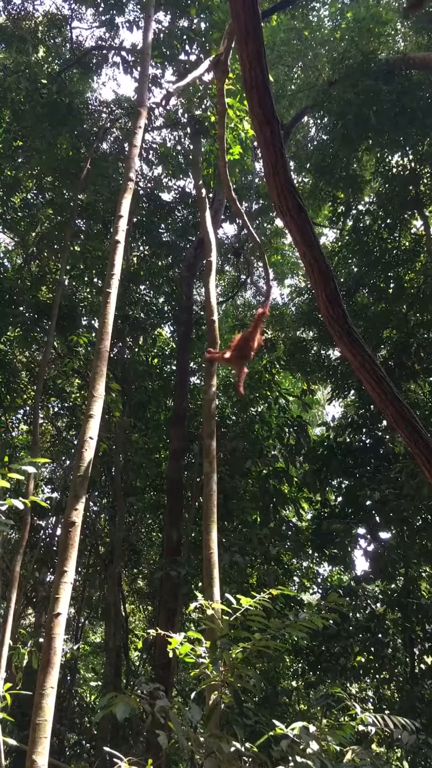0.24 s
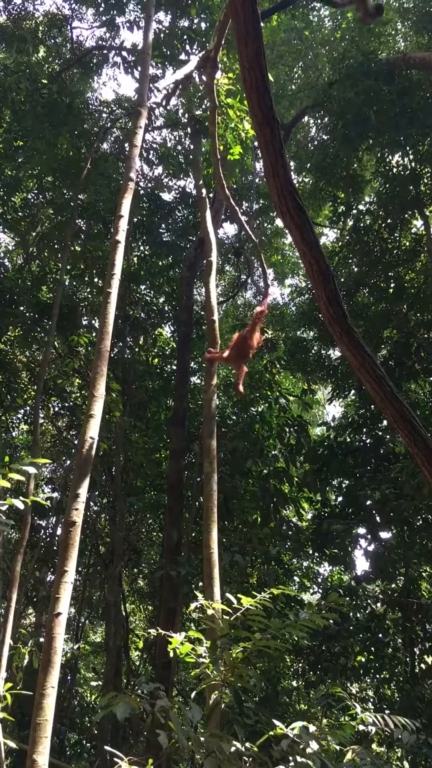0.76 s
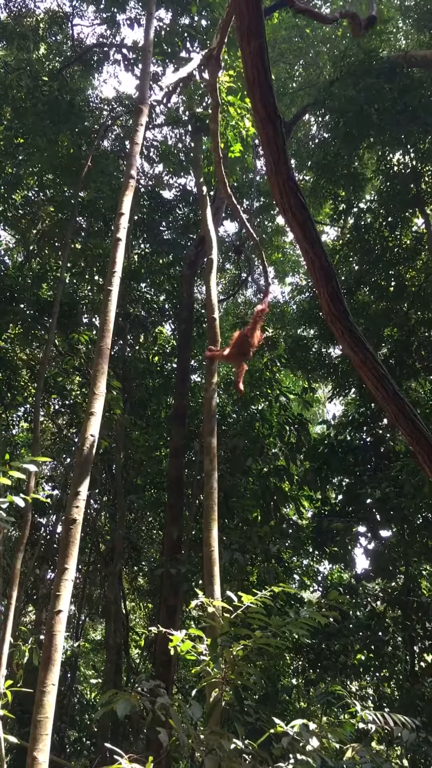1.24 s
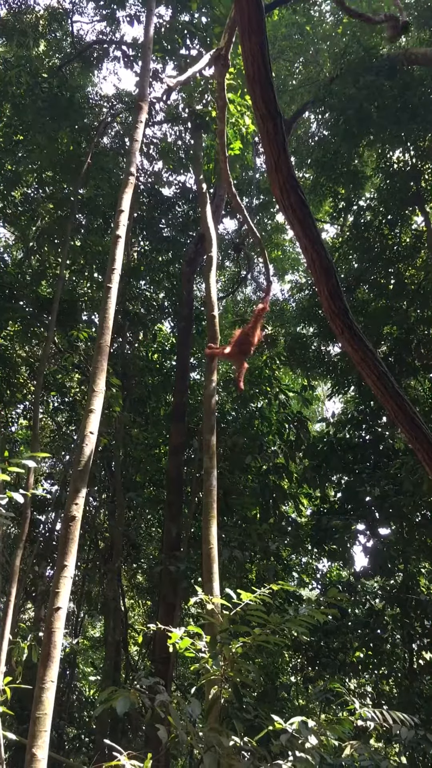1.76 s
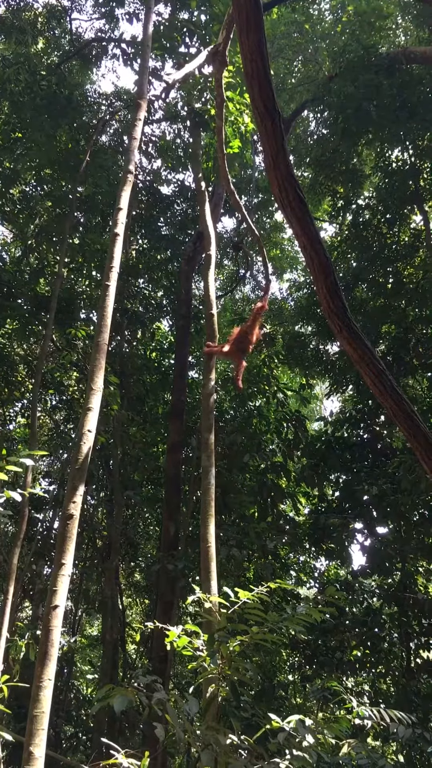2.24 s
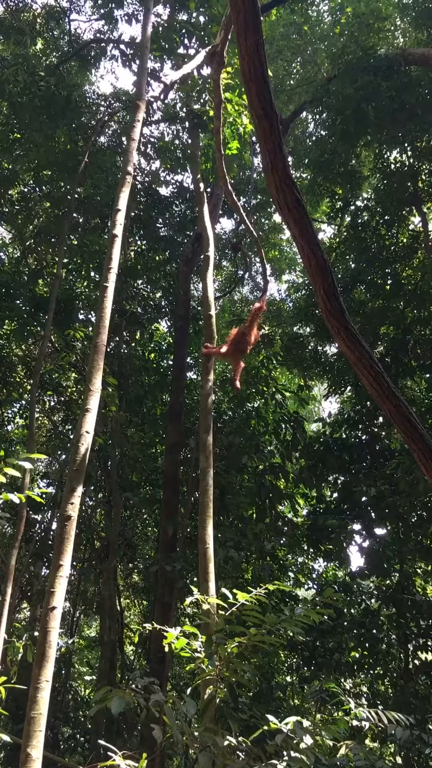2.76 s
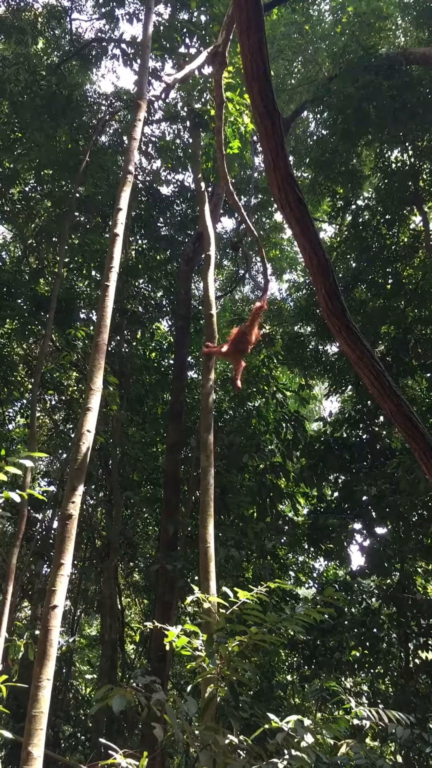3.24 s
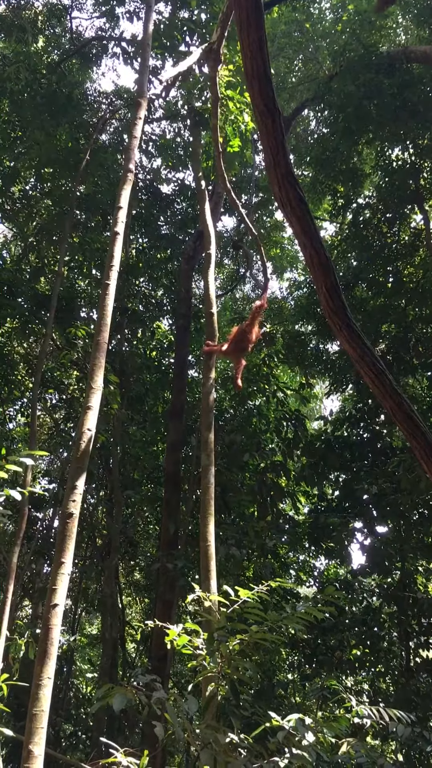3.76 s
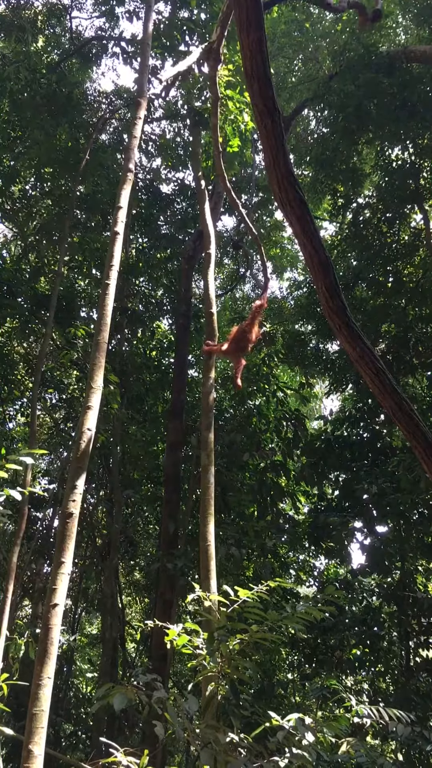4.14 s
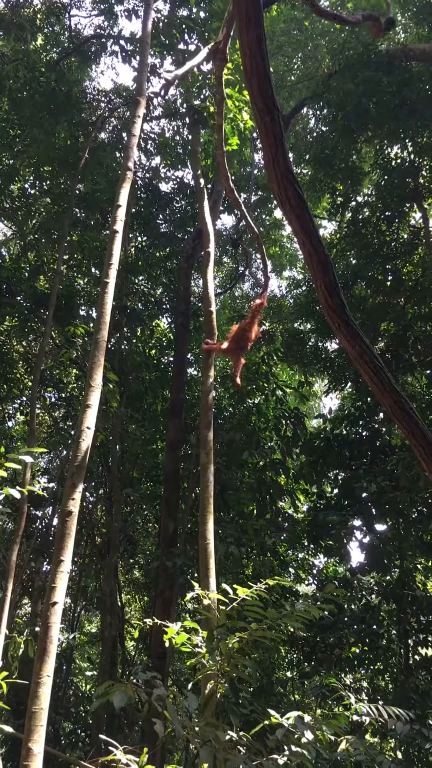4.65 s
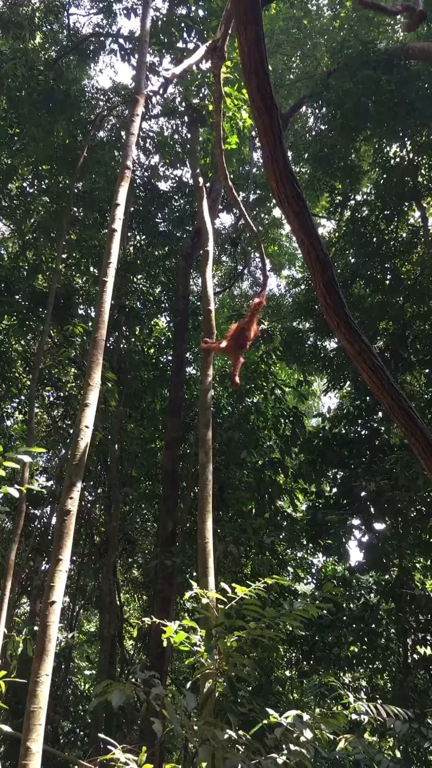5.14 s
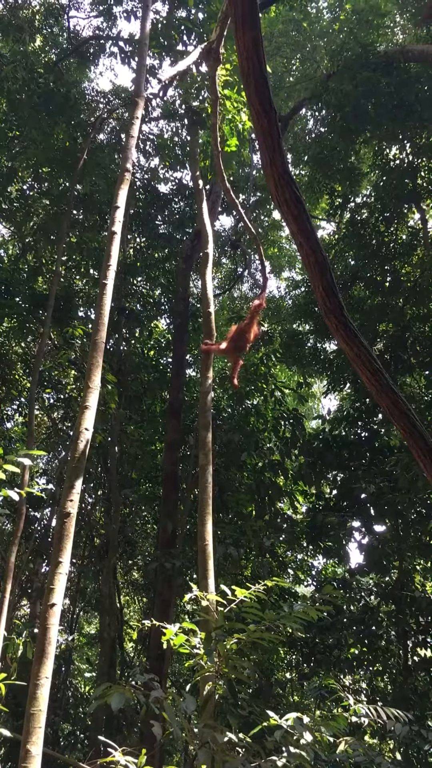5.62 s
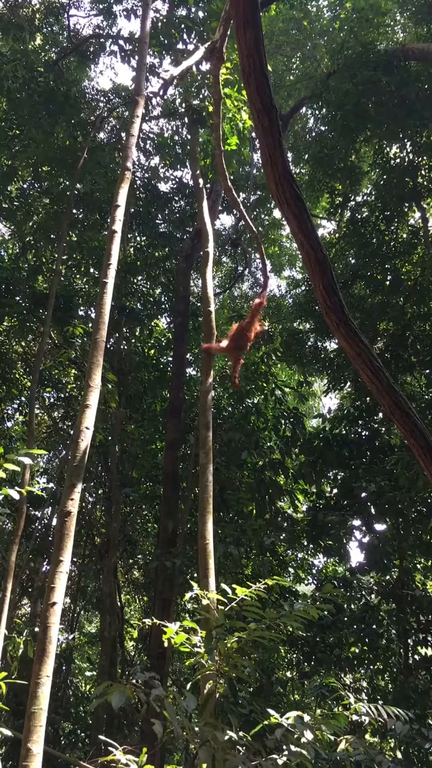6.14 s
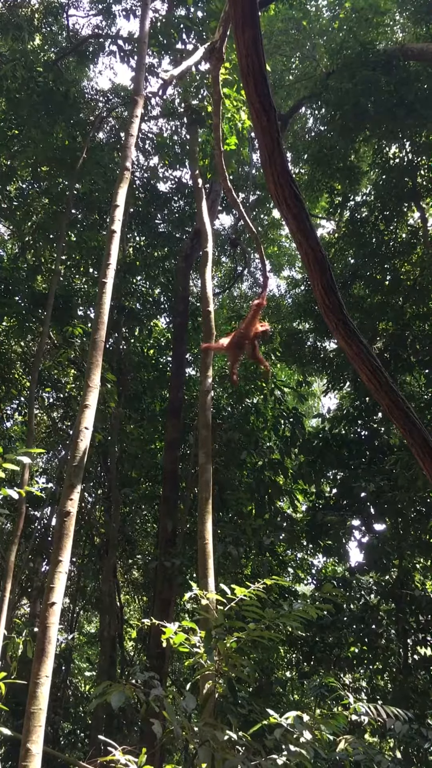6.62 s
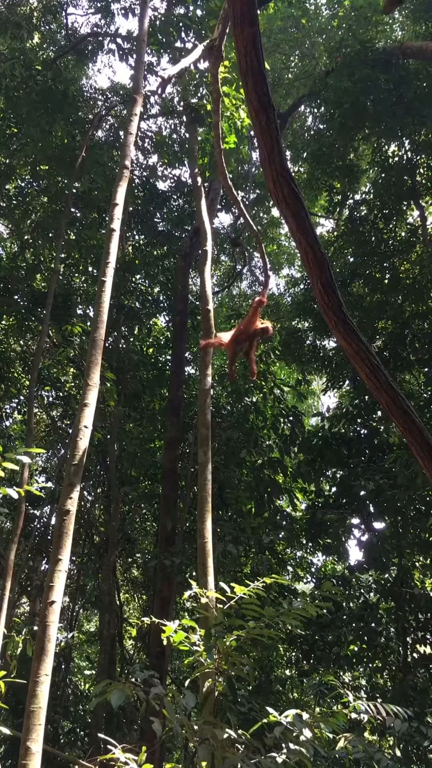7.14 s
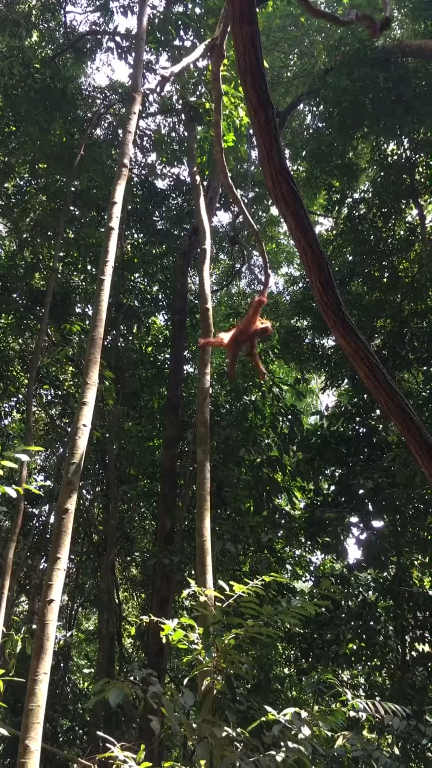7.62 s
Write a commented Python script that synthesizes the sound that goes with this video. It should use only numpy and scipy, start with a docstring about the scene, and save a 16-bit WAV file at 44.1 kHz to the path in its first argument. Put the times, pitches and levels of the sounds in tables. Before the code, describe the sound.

Cicadas sing in long, piercing, very high throbbing phrases over a steady insect buzz and leafy hiss, with a few soft low thumps.

```python
"""Midday cicadas in a rainforest

One cicada close by sings long, mostly rising phrases near 12 kHz, built from throbbing partials of a body tone.
Neighbours sing more faintly. Behind them far insects buzz as a blurred click train and hiss as resonant noise.
Shaped noise makes the leaf bed, two rustles, a high hiss and a low rumble of moving air.
Soft thumps, first a close pair and later a single one, are short decaying sine modes."""
import sys
import numpy as np
from scipy import signal
from scipy.fft import rfft, irfft, next_fast_len
from scipy.io import wavfile

SR = 44100
rng = np.random.default_rng(int(sys.argv[2]) if len(sys.argv) > 2 else 0)


def wrap_up_sound(samples):
    """Save the sound to the file named by the first command line argument, as 16-bit audio."""
    columns = np.atleast_2d(samples).T
    # keep every value between -1 and 1, then stretch to whole-number steps
    tamed = np.clip(columns, -1, 1)
    steps = np.round(tamed * 32767).astype(np.int16)
    wavfile.write(sys.argv[1], SR, steps)


N = 347508

# Pitch glide of the near cicada, one list a phrase. Each row: time in seconds, ring pitch in Hz.
NEAR_PITCH = [
    [(.12, 12277), (.21, 12201), (.25, 12180), (.484, 12202), (1.113, 12280), (1.6, 12330), (2.3, 12404),
     (2.5, 12420)],
    [(3.24, 12292), (3.315, 12267), (3.43, 12266), (3.829, 12305), (4.387, 12348), (5.335, 12424),
     (5.62, 12428)],
    [(6.32, 12313), (6.395, 12278), (6.445, 12272), (6.559, 12287), (6.924, 12318), (7.432, 12353),
     (7.876, 12385)],
]
# Loudness contour of its ring, one list a phrase. Each row: time in seconds, guide level in dB.
NEAR_RING_LEVEL = [
    [(0.12, -64), (0.2, -53), (0.32, -60), (0.49, -41.5), (0.52, -53), (0.58, -42.5), (0.62, -50),
     (0.75, -44.5), (0.99, -53), (1.11, -45.5), (1.25, -60), (1.29, -49), (1.37, -58), (1.45, -46.5),
     (1.54, -59), (1.64, -48), (1.76, -58), (1.84, -48), (1.99, -57), (2.17, -42), (2.25, -57), (2.29, -51),
     (2.41, -59), (2.5, -88)],
    [(3.24, -71), (3.33, -52), (3.44, -44), (3.51, -47.5), (3.6, -45), (3.65, -59), (3.73, -59),
     (3.84, -48.5), (4.3, -54), (4.39, -47), (4.5, -56), (4.54, -46), (4.78, -58), (4.88, -45), (4.97, -53),
     (5.01, -47), (5.06, -57), (5.12, -43.5), (5.19, -49), (5.25, -61), (5.34, -53), (5.38, -65),
     (5.41, -57), (5.62, -80)],
    [(6.32, -70), (6.366, -64), (6.392, -54), (6.436, -48.5), (6.57, -51), (6.648, -45.5), (6.704, -53),
     (6.748, -47), (6.8, -62), (6.926, -48), (6.96, -55), (7.082, -49), (7.126, -56), (7.19, -47),
     (7.242, -54), (7.298, -46.5), (7.354, -52), (7.402, -42), (7.438, -41), (7.48, -46), (7.628, -47.5),
     (7.692, -58), (7.71, -54.5), (7.876, -53)],
]
# Echoes off trunks favour some pitches and cancel others, alike in every phrase.
# Each row: ring pitch in Hz, guide level of the body tone in dB.
NEAR_BODY_ECHOES = [(12180, -67), (12199, -64), (12207, -73), (12219, -64.5), (12233, -73), (12243, -71),
                    (12251, -61), (12272, -63.5), (12288, -66.5), (12295, -82), (12303, -66),
                    (12312, -63.5), (12339, -65), (12346, -76), (12354, -64), (12376, -66.5), (12390, -79),
                    (12400, -74.5), (12414, -65.5), (12428, -75)]
# The same for the stroke line below the ring. Each row: ring pitch in Hz, guide level in dB.
NEAR_STROKE_ECHOES = [(12180, -60), (12200, -62.5), (12240, -64), (12262, -76), (12275, -53.5),
                      (12290, -72), (12312, -53), (12328, -63), (12345, -59), (12358, -62), (12368, -72),
                      (12380, -54), (12392, -63), (12400, -57.5), (12428, -65)]
# Lift of the body tone: one value in dB for each phrase.
PHRASE_BODY_DB = [1, 0, -0.5]
# Lines that follow the ring level. Each row: partial of the body tone, offset in half stroke rates,
# level in dB against the guide, scattered share of the power 0-1, blur (width of each of two poles) in Hz.
RING_LINES = [(4, 0, 3, .05, 30), (4, 2, -19, .5, 27), (4, -1, -18, .5, 40), (4, 1, -20, .6, 40),
              (4, -1, -9, .8, 280)]
# Lines that follow the body tone. Each row: partial, offset in half stroke rates, relative level in dB,
# scattered share 0-1, blur in Hz.
BODY_LINES = [(1, 0, 2, 0.05, 48), (1, 2, -18.5, 0.5, 14), (2, 0, -6.5, 0.25, 17), (3, 0, -3.5, 0.53, 18),
              (5, 0, -5, 0.37, 30), (5, -2, -1, 0.36, 34)]
# The stroke line just below the ring. Each row: partial, offset in half stroke rates, relative level in dB,
# scattered share 0-1, blur in Hz.
STROKE_LINES = [(4, -2, 0, 0.37, 29)]
NEAR_THROB_HZ = 302  # muscle strokes a second
ATTACK_S, RELEASE_S = 0.085, 0.24  # body tone and stroke line set in and die away
STROKE_FADE, STROKE_FADE_HZ = 0.46, 3.9  # random fading: scattered share 0-1, width of each pole


def near_cicada():
    """Three mostly rising phrases; weaker lines swell and fade as pitch crosses the echoes' peaks and nulls."""
    out = 0
    for pitch, ring_rows, body_db in zip(NEAR_PITCH, NEAR_RING_LEVEL, PHRASE_BODY_DB):
        t, ring_hz = span(pitch)
        edges = edges_db(t, ATTACK_S, RELEASE_S)
        ring = in_time(ring_rows, t)[0]
        body = through_nulls(NEAR_BODY_ECHOES, ring_hz) + body_db + edges
        stroke = through_nulls(NEAR_STROKE_ECHOES, ring_hz) + edges
        stroke = stroke + fading(STROKE_FADE, STROKE_FADE_HZ, count=len(t))
        lines = [RING_LINES, BODY_LINES, STROKE_LINES]
        out = out + phrase(t, ring_hz, [ring, body, stroke], NEAR_THROB_HZ, lines)
    return out


# Pitch glides of the neighbours, one list a phrase. Each row: time in seconds, ring pitch in Hz.
NEIGHBOUR_PITCH = [
    [(0, 11856), (.279, 11842), (.449, 11838)],
    [(.53, 11704), (.685, 11770), (.784, 11795), (1.004, 11835), (1.498, 11907)],
    [(3.9, 11701), (4.05, 11778), (4.149, 11806), (4.4, 11847), (4.698, 11891), (4.948, 11907)],
    [(6.2, 11385), (6.484, 11441), (6.639, 11460), (6.859, 11474), (7.048, 11492)],
]
# Neighbours' phrases. Each row: rise in seconds, fall in seconds, guide level of the ring in dB,
# clock time of the loudest body tone in seconds, guide level of the body tone there in dB.
NEIGHBOUR_PHRASES = [(.001, 0.11, -52, .2, -63.5), (.1, 0.61, -50.5, 1.104, -74),
                     (.25, .2, -51.5, 4.5, -68), (.28, 0.46, -54.5, 6.7, -62.5)]
# Lines that follow the neighbours' ring. Each row: partial of the body tone, offset in half stroke rates,
# relative level in dB, scattered share 0-1, blur (width of each of two poles) in Hz.
NEIGHBOUR_RING_LINES = [(4, 0, 1.5, 0.32, 28), (4, -2, -11, .6, 27), (4, 2, -11, 0.78, 52),
                        (5, 0, -20, .5, 33)]
# Lines that follow the neighbours' body tone. Each row: partial, offset in half stroke rates,
# relative level in dB, scattered share 0-1, blur in Hz.
NEIGHBOUR_BODY_LINES = [(1, 0, 0, .1, 17)]
NEIGHBOUR_THROB_HZ = 232  # muscle strokes a second
NEIGHBOUR_FADE, NEIGHBOUR_FADE_HZ = 0.43, 11  # random fading: scattered share 0-1, width of each pole
BODY_SWELL_DB_PER_S2 = 500


def neighbours():
    """Shorter phrases at lower pitch with slower strokes; the ring flutters, the body tone swells once."""
    out = 0
    for pitch, (rise, fall, ring_db, loudest, body_db) in zip(NEIGHBOUR_PITCH, NEIGHBOUR_PHRASES):
        t, ring_hz = span(pitch)
        flutter = fading(NEIGHBOUR_FADE, NEIGHBOUR_FADE_HZ, count=len(t))
        ring = ring_db + edges_db(t, rise, fall) + flutter
        body = body_db - BODY_SWELL_DB_PER_S2 * (t - loudest) ** 2
        lines = [NEIGHBOUR_RING_LINES, NEIGHBOUR_BODY_LINES]
        out = out + phrase(t, ring_hz, [ring, body], NEIGHBOUR_THROB_HZ, lines)
    return out


def phrase(t, ring_hz, levels_db, throb_hz, lines_by_level):
    """A cicada phrase: partials of the body tone with stroke side lines; echoes off trunks blur each line."""
    out = np.zeros(N)
    start = round(t[0] * SR)
    body_turn = 2 * np.pi * np.cumsum(ring_hz / 4) / SR  # the ring is four times the body tone
    half_strokes = np.pi * throb_hz * t
    for level_db, lines in zip(levels_db, lines_by_level):
        for partial, offset, line_db, scatter, blur_hz in lines:
            blur = np.sqrt(1 - scatter) + np.sqrt(scatter) * wander(blur_hz, count=len(t))
            turn = partial * body_turn + offset * half_strokes + rng.uniform(0, 2 * np.pi)
            line = np.real(blur * np.exp(1j * turn))
            out[start:start + len(t)] += np.sqrt(2) * from_db(level_db + line_db) * line
    return out


def span(pitch):
    """Sample times and ring pitch of a phrase."""
    first, last = round(pitch[0][0] * SR), min(N, round(pitch[-1][0] * SR))
    t = np.arange(first, last) / SR
    return t, in_time(pitch, t)[0]


EDGE_DB = -14  # level at the very start and end of a phrase, against its hold


def edges_db(t, rise, fall):
    """Attack, hold and release in dB; a phrase that reaches the end of the scene holds on."""
    fall = fall if t[-1] < N / SR - .01 else 1e-3
    away_from_hold = np.maximum(1 - (t - t[0]) / rise, 1 - (t[-1] - t) / fall)
    return EDGE_DB * np.clip(away_from_hold, 0, 1)


def fading(share, rate_hz, count):
    """A steady path and moving scattered paths add and cancel: level in dB with brief deep dips."""
    paths = np.sqrt(1 - share) + np.sqrt(share) * wander(rate_hz, count)
    return 20 * np.log10(np.abs(paths) + 1e-3)


def through_nulls(rows, at):
    """A dB table joined in amplitude: round swells, sharp nulls."""
    where, level_db = np.transpose(rows)
    return 20 * np.log10(np.interp(at, where, from_db(level_db)))


# Thumps. Each row: start in seconds, pitch in Hz, level of the lowest mode in dB as its decay begins,
# swell in seconds, 60 dB decay time in seconds, upper modes in dB against the lowest.
THUMPS = [(4.152, 158.5, -38, 0.0081, 0.2, -5), (4.193, 195, -45.5, 0.0041, 0.17, -11),
          (7.514, 184.6, -32.5, 0.0065, 0.076, -17.5)]
# Modes above the lowest. Each row: multiple of the pitch, level in dB against the upper-mode setting.
THUMP_MODES = [(1.75, -0.5), (2.6, -13), (3.5, -19.5)]


def thumps():
    """A soft knock swells for a moment and rings its low modes, with its own share of upper modes."""
    out = np.zeros(N)
    for start, hz, peak_db, swell, t60, upper_db in THUMPS:
        t = np.maximum(np.arange(N) / SR - start, 0)
        onset = np.sin(np.pi / 2 * np.minimum(t / swell, 1)) ** 2
        decay = from_db(peak_db - 60 * t / t60)
        lowest = np.sin(2 * np.pi * hz * t)
        upper = sum(from_db(upper_db + d) * np.sin(2 * np.pi * k * hz * t) for k, d in THUMP_MODES)
        out += onset * decay * (lowest + upper)
    return out


# Rustles. Each row: start in seconds, rise in seconds, fall in seconds, dull part in dB, bright part in dB.
RUSTLES = [(2.635, 0.15, 0.1, -63, -52.5), (4.19, 0.073, 0.16, -72, -57)]
# Spectrum of the dull part. Each row: frequency in Hz, relative density in dB.
DULL_COLOUR = [(2000, -31), (3000, -2), (3600, 3), (4300, -1), (5000, -29)]
# Spectrum of the bright part. Each row: frequency in Hz, relative density in dB.
BRIGHT_COLOUR = [(2500, -22), (4800, 0), (9000, -11), (11000, 0.5), (13500, -5.5), (15700, -4)]


def rustles():
    """A branch shakes: the swish starts dull and brightens as the leaves speed up."""
    t, dull, bright = np.arange(N) / SR, 0, 0
    for start, rise, fall, dull_db, bright_db in RUSTLES:
        # the dull part keeps a faint floor before and after the swish
        dull_shape = np.interp(t, np.cumsum([start, .02, rise, fall / 2]), [0.0077, 1, 0.67, 0.015])
        bright_shape = np.interp(t, np.cumsum([start, rise, fall]), [0, 1, 0])
        dull = dull + from_db(dull_db) * dull_shape
        bright = bright + from_db(bright_db) * bright_shape
    grain = from_db(1.5 * np.real(wander(150, count=N)))  # about 1 dB rms of fast roughness
    return grain * (dull * coloured(DULL_COLOUR) + bright * coloured(BRIGHT_COLOUR))


# Click rate of the far buzzers. Each row: time in seconds, clicks per second.
BUZZ_RATE = [(0, 310.6), (.8, 310.6), (1.6, 311.2), (2.4, 311.3), (2.7, 312.1), (3.7, 311.4), (4.4, 310.6),
             (6.4, 310.4), (7.88, 310.3)]
# Loudness of the far buzzers. Each row: time in seconds, level in dB.
BUZZ_LEVEL = [(0, -57), (1.4, -56.5), (2.45, -58), (2.7, -53), (3.1, -57.5), (3.75, -55.5), (5.6, -58),
              (7.45, -56), (7.66, -54.5), (7.88, -57.5)]
# Their wing resonance seen through the click harmonics. Each row: harmonic number, relative level in dB.
BUZZ_HARMONICS = [(23, -10.5), (24, -12.5), (25, -8), (26, -0.5), (27, -1), (28, -3), (29, -4), (30, -4.5),
                  (31, -8), (32, -14), (33, -20)]
CHORUS_FLICKER_DB, CHORUS_FLICKER_HZ = 0.87, 8.8  # rms waver, width of each pole


def buzzers():
    """Many insects click at nearly one rate: each harmonic of the click train becomes a narrow band."""
    turn = 2 * np.pi * np.cumsum(in_time(BUZZ_RATE)[0]) / SR
    bands = 0
    for harmonic, harmonic_db in BUZZ_HARMONICS:
        band = np.real(wander(56, count=N) * np.exp(1j * harmonic * turn))
        bands = bands + from_db(harmonic_db) * band
    level_db = in_time(BUZZ_LEVEL)[0] + flicker(CHORUS_FLICKER_DB, CHORUS_FLICKER_HZ, count=N)
    return from_db(level_db) * rms_one(bands)


# Far hissing choruses. Each row: time in seconds, main band level in dB, lower band level in dB.
HISS_LEVELS = [(0, -59.5, -71), (1.1, -56, -68.5), (2.2, -58, -70.5), (2.95, -59, -72), (3.64, -64, -68.5),
               (3.8, -57.5, -71), (4.5, -57.5, -68.5), (5.4, -57.5, -72), (6.28, -58, -67),
               (6.4, -59.5, -74), (7.0, -65, -70), (7.18, -58, -70), (7.88, -57.5, -71.5)]
# Resonances of the main band. Each row: centre in Hz, width of each pass in Hz, relative level in dB.
MAIN_BAND = [(6215, 910, 1), (5736, 840, -6.5)]
# Resonances of the lower band. Each row: centre in Hz, width of each pass in Hz, relative level in dB.
LOWER_BAND = [(4434, 370, 0), (2916, 370, 0)]


def hissers():
    """Two broad choruses of resonant noise that swell and dip, each flickering slightly."""
    out = 0
    for level_db, band in zip(in_time(HISS_LEVELS), [MAIN_BAND, LOWER_BAND]):
        waver = flicker(CHORUS_FLICKER_DB, CHORUS_FLICKER_HZ, count=N)
        out = out + from_db(level_db + waver) * resonant_noise(band)
    return out


def resonant_noise(modes):
    """Dense unsynchronised clicks act as noise; each body resonance rings twice over."""
    out = 0
    for hz, width_hz, level_db in modes:
        r = np.exp(-np.pi * width_hz / SR)
        section = [1, 0, -1, 1, -2 * r * np.cos(2 * np.pi * hz / SR), r * r]
        ringing = signal.sosfilt([section] * 2, rng.standard_normal(N))
        out = out + from_db(level_db) * rms_one(ringing)
    return rms_one(out)


def flicker(depth_db, rate_hz, count):
    """A level in dB that wavers at random by the given rms depth."""
    return depth_db * np.sqrt(2) * np.real(wander(rate_hz, count))


# Spectrum of the highest hiss. Each row: frequency in Hz, relative density in dB.
HIGH_HISS_COLOUR = [(12400, -39), (12700, 6), (14000, -4), (15700, 0)]
HIGH_HISS_DB, HIGH_HISS_DROP_DB, HIGH_HISS_EDGE_S = -71, -29, .08  # level in pauses, change, ramp


def high_hiss():
    """Band of noise above the ring that drops far down while the near cicada sings."""
    t = np.arange(N) / SR
    singing = 0
    for pitch in NEAR_PITCH[:-1]:
        inside = np.minimum(t - pitch[0][0] - ATTACK_S, pitch[-1][0] - RELEASE_S - t)
        singing = singing + np.clip(inside / HIGH_HISS_EDGE_S + .5, 0, 1)
    inside_last = t - NEAR_PITCH[-1][0][0] - ATTACK_S  # the last phrase holds to the end
    singing = singing + np.clip(inside_last / HIGH_HISS_EDGE_S + .5, 0, 1)
    return from_db(HIGH_HISS_DB + HIGH_HISS_DROP_DB * singing) * coloured(HIGH_HISS_COLOUR)


# Spectrum of the leaf bed. Each row: frequency in Hz, relative density in dB.
LEAF_COLOUR = [(210, -44), (350, -14), (517, -14), (1030, -15), (1990, -17.5), (3120, -11.5), (3970, -19),
               (4350, -15.5), (4900, -15.5), (6230, -3.5), (7300, -17), (8410, -5), (11200, -8),
               (12450, -14.5), (12800, -50)]
LEAVES_DB = -55.5


def leaf_noise():
    """Countless small leaf contacts blend into steady shaped noise."""
    return from_db(LEAVES_DB) * coloured(LEAF_COLOUR)


# Loudness of the rumble. Each row: time in seconds, level in dB.
RUMBLE_LEVEL = [(0, -54), (1.6, -54.5), (2.3, -56), (3.6, -56.5), (4.8, -57.5), (6.1, -58.5), (7.88, -57.5)]
# Spectrum of the rumble. Each row: frequency in Hz, relative density in dB.
RUMBLE_COLOUR = [(20, -39), (30, -24), (42, -3.5), (59, -0.5), (114, 0), (214, -8.5), (260, -12),
                 (320, -14), (450, -25.5), (700, -45)]


def moving_air():
    """Low noise of moving air under small random gusts."""
    gusts = from_db(1.0 * np.real(wander(10.4, count=N)))  # about 0.7 dB rms
    return from_db(in_time(RUMBLE_LEVEL)[0]) * gusts * coloured(RUMBLE_COLOUR)


def from_db(db):
    """Amplitude of a level in dB."""
    return 10 ** (np.asarray(db) / 20)


def rms_one(x):
    """The signal scaled to rms 1."""
    return x / np.sqrt(np.mean(np.abs(x) ** 2) + 1e-20)


def in_time(rows, at=None):
    """Columns of a curve table, joined by straight lines."""
    at = np.arange(N) / SR if at is None else at
    s, *columns = np.transpose(rows)
    return [np.interp(at, s, c) for c in columns]


def coloured(points):
    """Noise with the given spectrum, silent outside it; rms 1."""
    size = next_fast_len(N)
    hz = np.arange(1, size // 2 + 2) * SR / size
    f, level_db = np.transpose(points)
    gain = from_db(np.interp(np.log(hz), np.log(f), level_db, left=-200, right=-200))
    return rms_one(irfft(rfft(rng.standard_normal(size)) * gain, size)[:N])


def wander(width_hz, count):
    """Complex slow noise of rms 1 from two equal poles of the given width: spreads a line into a band."""
    r = np.exp(-40 * np.pi * width_hz / SR)  # one slow step every 40 samples
    raw = rng.standard_normal((2, count // 40 + 502))
    slow = signal.lfilter([1], [1, -2 * r, r * r], raw)[:, 500:]  # skip the filter's start
    return np.interp(np.arange(count) / 40, np.arange(slow.shape[1]), rms_one(slow[0] + 1j * slow[1]))


def scene():
    """All sources, alike in both channels."""
    insects = near_cicada() + neighbours() + buzzers() + hissers()
    mono = insects + rustles() + thumps() + moving_air() + leaf_noise() + high_hiss()
    return np.stack([mono, mono])


CUTOFF_HZ = 15800


def record(dry):
    """A steep elliptic low-pass cuts the top."""
    return signal.sosfilt(signal.ellip(12, .5, 60, CUTOFF_HZ, fs=SR, output="sos"), dry)


dry = scene()
out = record(dry)
wrap_up_sound(out)
```